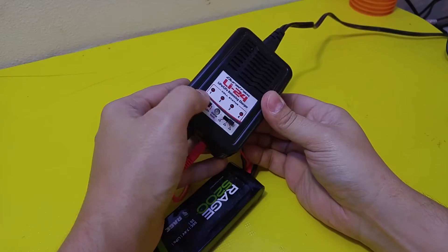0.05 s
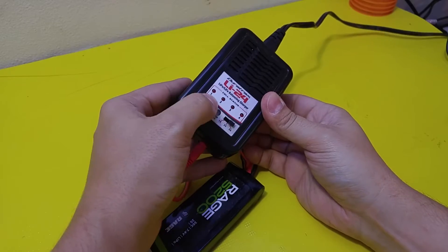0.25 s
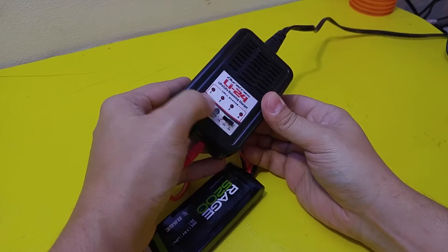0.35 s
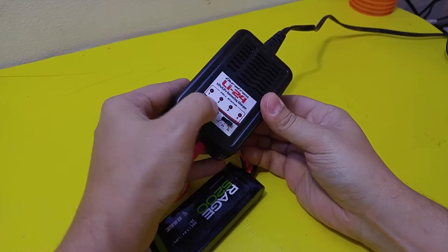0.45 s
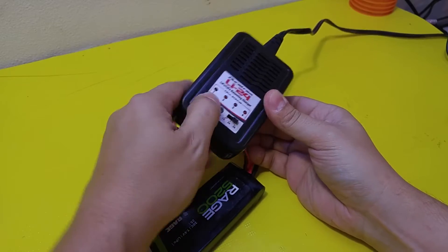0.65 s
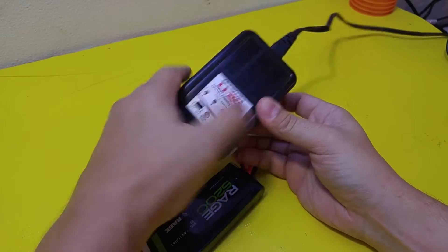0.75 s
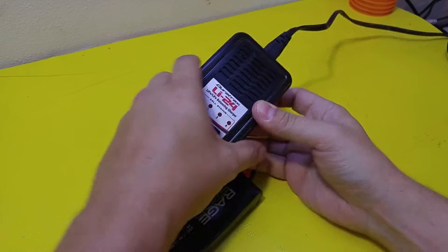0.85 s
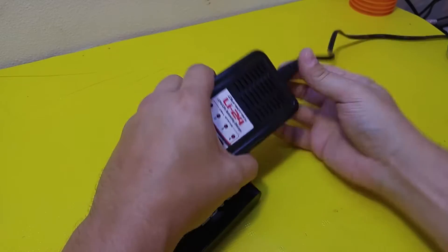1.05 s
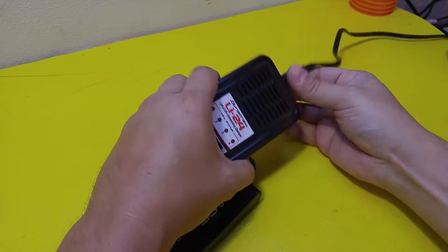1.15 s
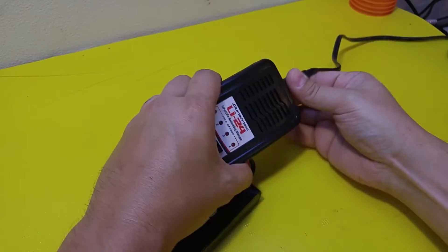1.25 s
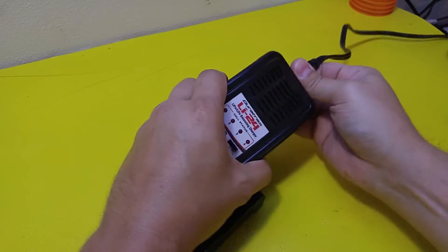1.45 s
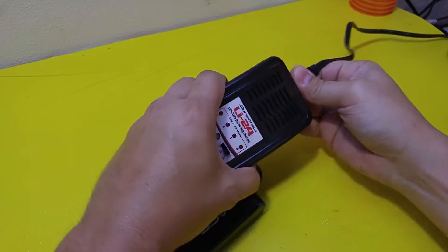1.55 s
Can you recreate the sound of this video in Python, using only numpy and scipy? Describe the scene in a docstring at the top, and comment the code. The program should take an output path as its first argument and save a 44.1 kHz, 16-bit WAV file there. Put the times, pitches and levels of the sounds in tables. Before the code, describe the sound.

Two sharp clicks of a small plastic switch, then faint handling ticks in a quiet room.

```python
"""A quiet room holds a low rumble and a faint mains hum. Close by, fingers brush a small plastic
battery charger. At 0.23 s its slide switch snaps over, and at 0.57 s it snaps back: each impact
cracks and excites the damped modes of the switch and the hollow case. Then the hands shift their
grip: skin rubs the plastic with a grainy hiss, and light touches make the case tick and knock."""
import sys
import numpy as np
from scipy import signal
from scipy.fft import rfft, irfft
from scipy.io import wavfile
from scipy.ndimage import uniform_filter1d

SR = 44100
rng = np.random.default_rng(int(sys.argv[2]) if len(sys.argv) > 2 else 0)


def transcribe(u):
    """Save the signal u as a 16-bit wav file named by the first command-line argument.

    u: samples, shape (n,) or (channels, n), limited to [-1, 1]; the rate is SR.
    q: integer samples, one column per channel.
    """
    v = np.clip(np.atleast_2d(u).T, -1, 1)
    q = np.round(v * 32767).astype(np.int16)
    wavfile.write(sys.argv[1], SR, q)


N = 70560

# Spectrum of the room noise: frequency_hz, relative_db
AIR_SPECTRUM = [(20, -31), (35, -20), (55, -1.5), (80, 1), (130, -3.5), (170, -15.5), (260, -10.5),
                (350, -4.5), (440, -10.5), (490, -24.5), (640, -8), (900, -17.5), (1300, -19),
                (1900, -25.5), (3600, -27.5), (3950, -24.5), (4400, -25.5), (5200, -28), (8200, -23.5),
                (9700, -31), (15500, -30.5)]
# Partials of the mains hum: pitch_hz, rms_db
HUM_PARTIALS = [(59.8, -74), (119.4, -71), (360, -78)]
# Reverberation time: frequency_hz, t60_s
REVERB_TIMES = [(250, 0.6), (1500, 0.4), (4500, 0.51), (8000, 0.37), (15000, .25)]
# Starting spectrum of the reverberation: frequency_hz, relative_db
REVERB_SPECTRUM = [(100, -7), (330, -1), (700, 6), (1250, 0), (1900, 5.5), (3300, -2.5), (5500, -1.5),
                   (8500, 0.5), (11500, -1.5), (15000, -0.5)]
# Reflections from the desk and hands: delay_s, gain_db
REFLECTIONS = [(.0031, -13.5), (.0049, -27), (0.0115, -22.5)]
# Strokes of skin on the case: middle_s, half_width_s, level_db
BRUSH_STROKES = [(0.004, .04, -64.5), (0.13, .012, -73), (0.863, 0.11, -63.5), (.98, 0.045, -59),
                 (1.162, 0.063, -66.5), (1.265, .015, -66.5), (1.422, 0.021, -53), (1.45, 0.062, -65.5),
                 (1.576, 0.056, -60.5)]
# Spectrum of the friction: frequency_hz, relative_db
BRUSH_SPECTRUM = [(300, -34), (800, 0.5), (1270, 5), (1900, -5.5), (3000, -14.5), (4700, -6.5),
                  (5600, -9.5), (7000, 4), (7800, -1.5), (8450, 5), (9800, -1), (12500, -10.5),
                  (16000, -19)]
# Light touches: start_s, knock_db, ring_db, click_db, click_centre_hz, click_width_octaves, decay_s
TOUCHES = [(0.026, -73, -51, -44, 4220, .35, 0.00085), (.2005, -70, -51, -49, 8400, 0.34, .002),
           (.94, -53.5, -66, -60, 4000, 1.0, 0.0072), (.975, -52.5, -68, -58, 8000, 0.48, .005),
           (1.112, -56, -75, -52.5, 8300, 0.16, 0.0044), (1.2956, -51.5, -59, -49.5, 2700, 0.62, 0.0058),
           (1.317, -33.5, -59, -45.5, 3600, 1.0, 0.0026), (1.331, -71, -70, -50.5, 8500, 0.49, .008),
           (1.392, -48.5, -59, -53, 6540, 1, 0.0044), (1.4, -41.5, -38, -30.5, 6600, 0.68, 0.0016),
           (1.442, -60, -69, -39, 9200, .5, .002), (1.4489, -47.5, -43, -39, 4800, 1.0, 0.0022),
           (1.4874, -66, -62, -47, 7600, 1, 0.0022), (1.494, -47.5, -47, -36.5, 9300, 0.81, 0.0016),
           (1.590, -82, -62, -50, 7000, 1.0, 0.0022)]
# Case modes, low for a soft knock and high for a hard touch: pitch_hz, relative_db, t60_s
KNOCK_MODES = [(1069, -4.5, 0.036), (1244, -1.5, .032), (1375, 1.5, 0.02), (2020, -18, 0.048)]
SHELL_MODES = [(2150, -14, 0.043), (2700, -5, .045), (3070, -9, .025), (4300, -8, .025), (4680, -3, .032),
               (8480, 0, .028)]
# Modes of switch and case at each stop: pitch_hz, relative_db, t60_s
FIRST_STOP_MODES = [(272, -35, .22), (1130, -28, .03), (1347, -22, 0.034), (1573, -29, 0.055),
                    (1910, -35, .05), (2817, -25, 0.022), (3450, -17.5, .03), (6200, -10, 0.026),
                    (6610, -8, 0.021), (7470, -13, 0.029), (7390, -7, 0.021), (8750, -10, .022),
                    (8980, -2, 0.016), (10570, -10, .018), (11170, -7, .018), (15400, -18, .014)]
SECOND_STOP_MODES = [(412.5, -36, 0.2), (1230, -25, 0.057), (1565, -21.5, 0.066), (1760, -29, .06),
                     (1970, -21.5, 0.058), (3410, -17.5, 0.037), (5110, -22, 0.019), (5860, -24, 0.027),
                     (5980, -17, 0.024), (6600, -12.5, 0.017), (7890, -3.5, 0.018), (8473, -4, 0.037),
                     (9190, -15, 0.05), (12420, -11, 0.022), (13900, -14, 0.04)]
# Spectrum of the crack at each stop: frequency_hz, relative_db
FIRST_CRACK_SPECTRUM = [(60, -35), (150, -22.5), (330, -14), (560, -17.5), (850, -23), (1330, -7),
                        (1700, -15), (2250, -23.5), (2800, -11.5), (3400, -10), (4500, -12), (5400, -11.5),
                        (6200, -0.5), (6900, -5.5), (7500, 1.5), (7900, -6), (8900, 3.5), (9800, -6),
                        (11400, 0.5), (12500, -10.5), (13700, -8.5), (16000, -9.5)]
SECOND_CRACK_SPECTRUM = [(150, -34), (400, -12), (750, -22), (1250, -11), (1900, -12.5), (2250, -19),
                         (2800, -9.5), (3350, -9), (3750, -14.5), (4500, -11.5), (5700, -2), (6400, -6.5),
                         (7000, -10.5), (8400, 4), (9900, -8), (11600, -12.5), (12600, -4.5),
                         (14200, -10.5), (16000, -14.5)]
# Snaps of the switch: impact_s, ring_db, crack_db, crack_decay_s, travel_s
SWITCH_SNAPS = [(0.2331, -13.5, -10, 0.001, .0011), (0.5684, -14.5, -14, 0.0013, .0013)]

RING_TO_ROOM_DB = -6.5  # the case beams its ringing at the listener, so less reaches the room


def amp(db):
    """Decibels to amplitude ratio."""
    return 10 ** (np.asarray(db) / 20)


def unit_rms(x):
    """Normalisation to unit mean power."""
    return x / np.sqrt(np.mean(x ** 2) + 1e-20)


def curve_at(points, hz):
    """Interpolation on a log-frequency axis."""
    frequencies, values = np.transpose(points)
    return np.interp(np.log(hz + 1), np.log(frequencies + 1), values)


def add(mix, start_s, sound):
    """Superposition: a sound joins the mix at its start time."""
    part = mix[max(round(start_s * SR), 0):][:len(sound)]
    part += sound[:len(part)]


def colour(x, db_at, size=4096):
    """Minimum-phase filtering at unit energy; db_at gives the spectral shape."""
    hz = abs(np.fft.fftfreq(size, 1 / SR))
    log_gain = np.log(amp(np.maximum(db_at(hz), -90)))
    response = np.exp(np.conj(signal.hilbert(log_gain)))
    taps = np.fft.ifft(response).real[:size // 2]
    return signal.fftconvolve(x, taps / np.linalg.norm(taps))[:len(x)]


def ring(modes, t):
    """Free vibration: a sum of damped modes, alternating in sign."""
    return sum((-1) ** k * amp(db - 60 * t / t60) * np.sin(2 * np.pi * hz * t)
               for k, (hz, db, t60) in enumerate(modes))


def contact_noise(force, size=4096):
    """Tiny contacts of random sign make broadband noise, whitened here at constant energy."""
    contacts = force * rng.choice([-1., 1.], len(force))
    power = uniform_filter1d(abs(rfft(contacts, size)) ** 2, size=25)
    whitening_db = -10 * np.log10(power / power.mean() + 1e-6)
    white = colour(contacts, lambda f: np.interp(f, np.fft.rfftfreq(size, 1 / SR), whitening_db))
    return white * np.linalg.norm(force) / np.linalg.norm(white)


def background(air_db=-59.5):
    """Stationary noise: a continuous spectrum of rumble and hiss under the lines of mains hum."""
    t, hz = np.arange(N) / SR, np.fft.rfftfreq(N, 1 / SR)
    air = irfft(rfft(rng.standard_normal(N)) * amp(curve_at(AIR_SPECTRUM, hz)), N)
    hum = sum(amp(db) * np.sqrt(2) * np.sin(2 * np.pi * (f * t + rng.random()))
              for f, db in HUM_PARTIALS)
    return amp(air_db) * unit_rms(air) + hum


def reverberation(x, gain_db=-11, rise_s=0.00542):
    """A diffuse field builds up, then decays exponentially, fastest in the high treble."""
    hz, t, bands = signal.stft(rng.standard_normal(SR * 3 // 4), SR, nperseg=256)
    band_db = curve_at(REVERB_SPECTRUM, hz)[:, None] - 60 * t / curve_at(REVERB_TIMES, hz)[:, None]
    tail = signal.istft(bands * amp(band_db), SR, nperseg=256)[1]
    tail *= 1 - np.exp(-np.arange(len(tail)) / SR / rise_s)
    return amp(gain_db) * signal.fftconvolve(x, tail / np.linalg.norm(tail))[:N]


def with_reflections(direct):
    """Comb filtering: early reflections from desk and hands interfere with the direct sound."""
    total = direct.copy()
    for delay_s, db in REFLECTIONS:
        add(total, delay_s, amp(db) * direct)
    return total


def skin_friction(grain_db=2.5):
    """Uneven sliding friction of skin on plastic makes noise that swells and fades with each stroke."""
    t = np.arange(N) / SR
    envelope = sum(amp(db) * np.exp(-((t - middle_s) / half_width_s) ** 2)
                   for middle_s, half_width_s, db in BRUSH_STROKES)
    noise = rng.standard_normal(N)
    roughness = unit_rms(uniform_filter1d(rng.standard_normal(N), size=60))
    grains = unit_rms(noise * amp(grain_db * roughness))
    return envelope * colour(grains, lambda f: curve_at(BRUSH_SPECTRUM, f))


def case_ticks(rolloff_hz=11000, knock_rise_s=0.00092):
    """Light impacts of fingers and plug click and excite the case modes. Returns direct, to_room."""
    clicks, rings, t = np.zeros(N), np.zeros(N), np.arange(SR // 8) / SR
    knock = (1 - np.exp(-t / knock_rise_s)) * ring(KNOCK_MODES, t)
    shell = ring(SHELL_MODES, t)
    for start_s, knock_db, ring_db, click_db, centre_hz, width_octaves, decay_s in TOUCHES:
        def band_db(hz):
            octaves = np.log2((hz + 1) / centre_hz)
            return -20 * np.log10(1 + (octaves / width_octaves) ** 2 + (hz / rolloff_hz) ** 4)
        click = colour(contact_noise(np.exp(-t / decay_s)), band_db)
        add(clicks, start_s, amp(click_db) * click)
        add(rings, start_s, amp(ring_db) * shell + amp(knock_db) * knock)
    return clicks + rings, clicks + amp(RING_TO_ROOM_DB) * rings


def slide_switch(scrape_db=-11, rattle_db=-14.5, rattle_decay_s=0.0055):
    """Impact excitation: the slider scrapes over its detent, cracks against the stop and rattles,
    leaving switch and case in free vibration. Returns direct, to_room."""
    direct, to_room, t = np.zeros(N), np.zeros(N), np.arange(SR // 4) / SR
    stops = (FIRST_STOP_MODES, FIRST_CRACK_SPECTRUM), (SECOND_STOP_MODES, SECOND_CRACK_SPECTRUM)
    for (impact_s, ring_db, crack_db, decay_s, travel_s), (modes, spectrum) in zip(SWITCH_SNAPS, stops):
        since_impact = np.maximum(t - travel_s, 0)
        impact = np.exp(-since_impact / decay_s)
        rattle = amp(rattle_db) * np.exp(-since_impact / rattle_decay_s)
        force = amp(crack_db) * np.where(t < travel_s, amp(scrape_db), impact + rattle)
        crack = colour(contact_noise(force), lambda f: curve_at(spectrum, f))
        ringing = amp(ring_db) * ring(modes, t)
        add(direct, impact_s - travel_s, crack)
        add(direct, impact_s, ringing)
        # Summed over all directions the crack is smoother: one impulse of equal energy.
        impulse = np.linalg.norm(force) * (t == 0)
        smooth_crack = colour(impulse, lambda f: curve_at(spectrum, f))
        add(to_room, impact_s, smooth_crack + amp(RING_TO_ROOM_DB) * ringing)
    return direct, to_room


def scene():
    """Direct sound, early reflections, diffuse field and background add linearly."""
    direct, to_room = np.add(slide_switch(), case_ticks()) + skin_friction()
    return (with_reflections(direct) + reverberation(to_room) + background())[None]


def record(dry):
    """Band limiting by a linear-phase low-pass filter."""
    cutoff_hz = 16100
    lowpass = signal.firwin(255, cutoff_hz, window=("kaiser", 8), fs=SR)
    return signal.oaconvolve(dry, lowpass[None], "same")


dry = scene()
out = record(dry)
transcribe(out)
```